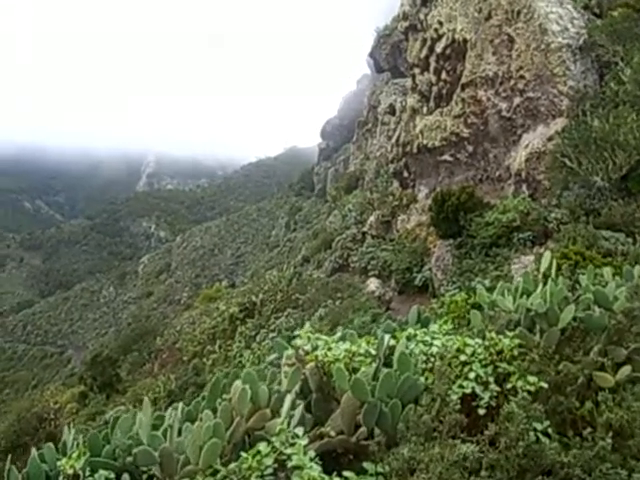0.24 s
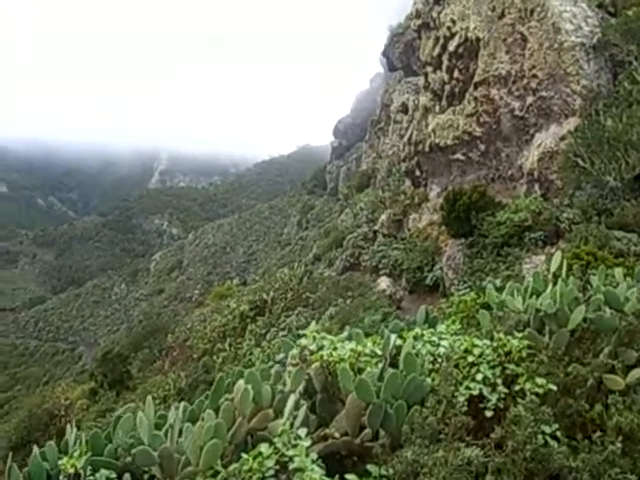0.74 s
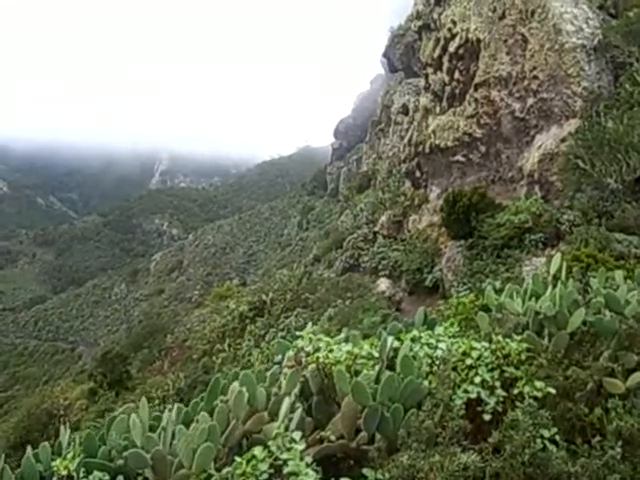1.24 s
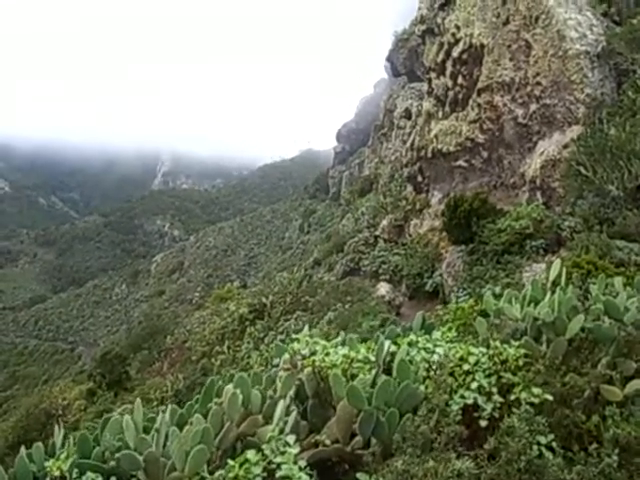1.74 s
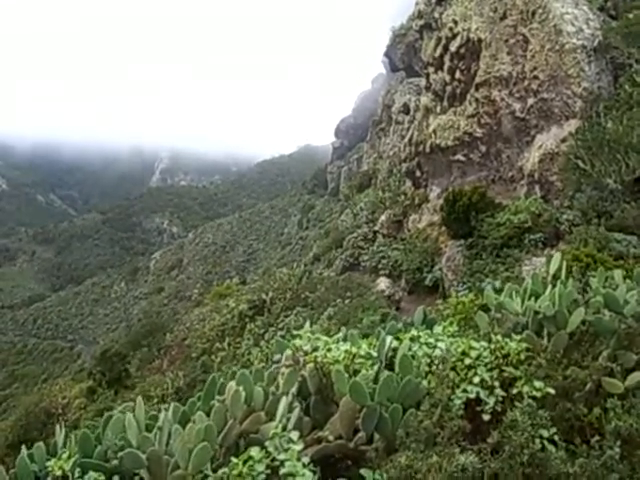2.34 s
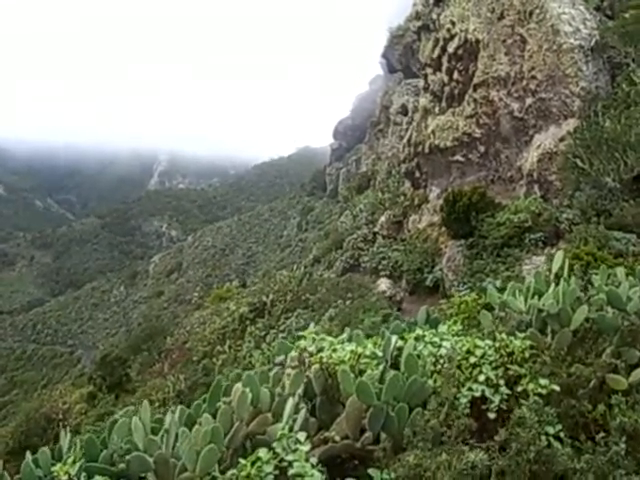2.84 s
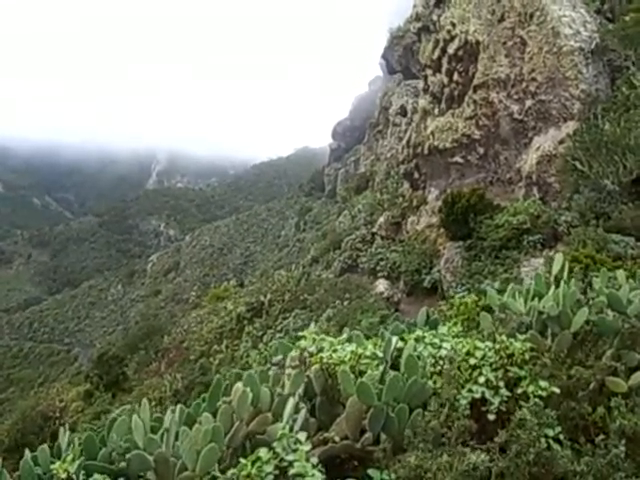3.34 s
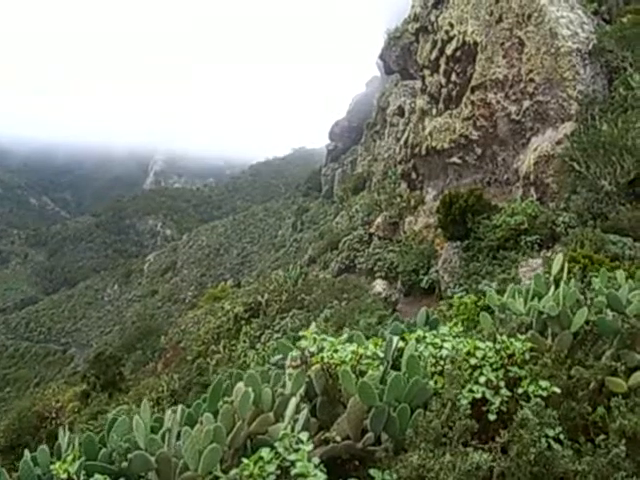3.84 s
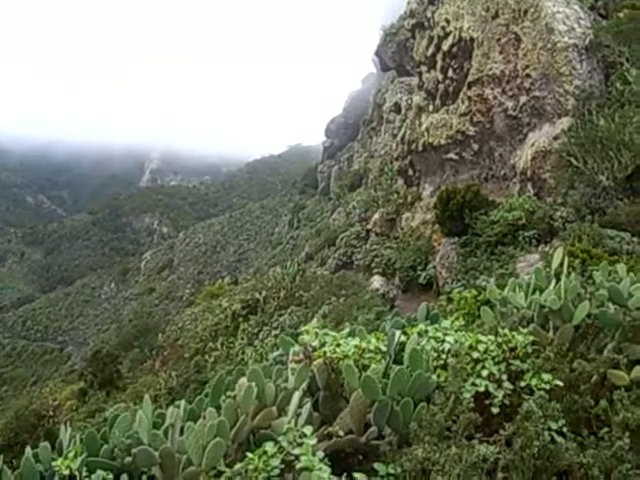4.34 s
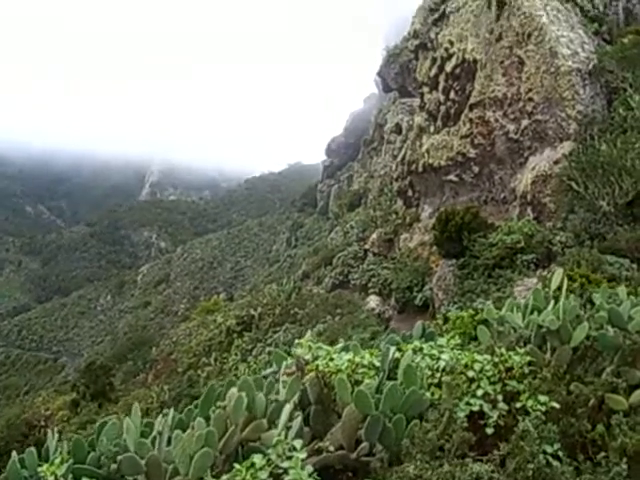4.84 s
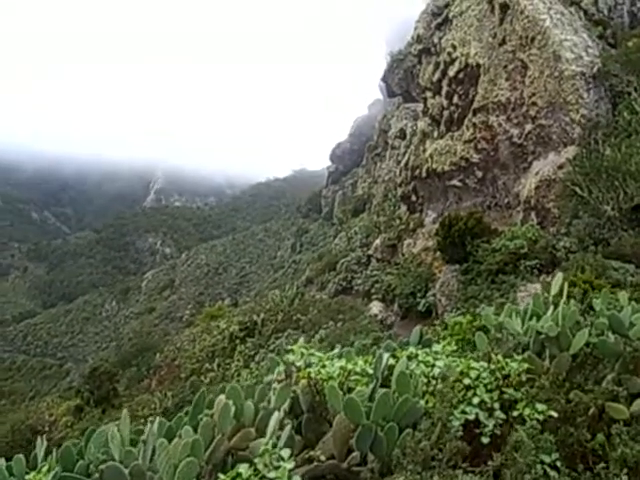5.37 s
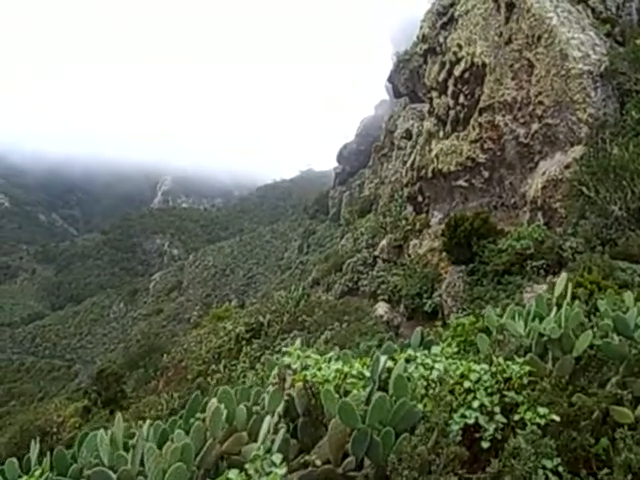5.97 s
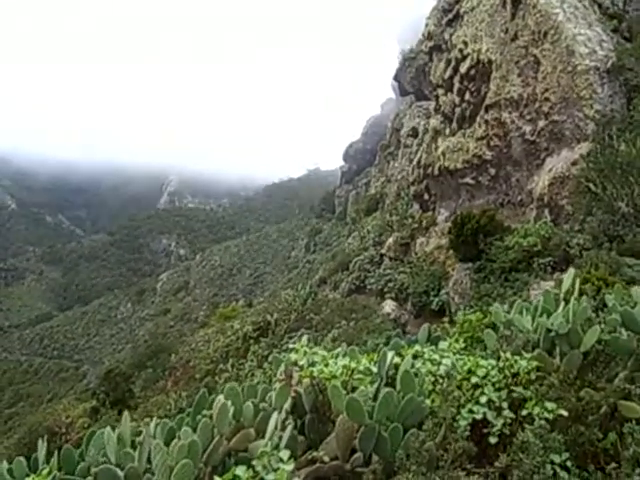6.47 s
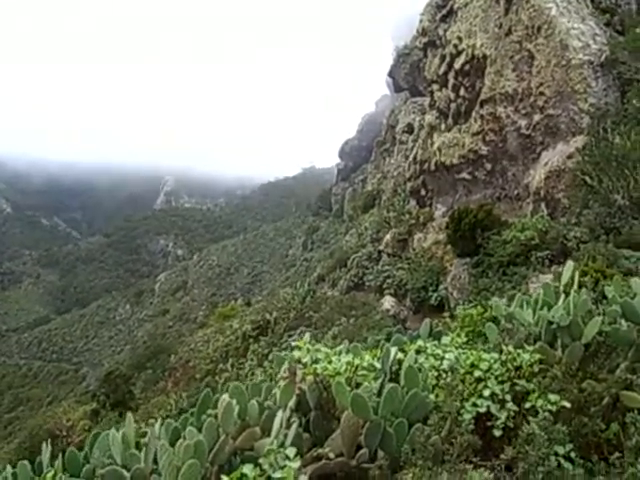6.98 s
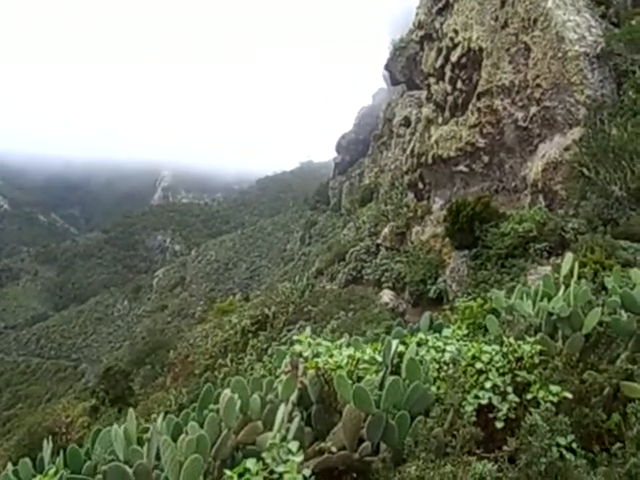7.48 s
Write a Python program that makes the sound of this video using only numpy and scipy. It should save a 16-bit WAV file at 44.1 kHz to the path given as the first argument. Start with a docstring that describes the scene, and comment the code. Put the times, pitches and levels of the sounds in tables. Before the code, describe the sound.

A soft, steady wash of open air runs throughout on a brushy hillside, with a distant bird giving very faint, short chirps. From about 1.1 to 1.8 seconds a small bird nearby sings three high, slightly rough falling notes, then lower, mellow warbles and chips until 2.6 seconds, with a slight cliff echo. A twig ticks at 2.2 seconds and leaves rustle faintly. Between 3 and 5.5 seconds the distant bird twitters while light puffs of wind rumble on the microphone; another tick comes at 4.8. The near bird gives two thin, very high whistles at 5.6 and 5.9 seconds, overlapped by the strongest gust, a brief low buffeting. A quick run of about five bright rising chirps follows from 6.1 to 6.8 seconds. Soft handling knocks sound faintly at 5.1 and 6 seconds, and a little more clearly twice around 6.9 to 7 seconds.

```python
"""A robin sings two phrases on a brushy hillside, each note a gliding near-sine from its syrinx.
Shrubs scatter the notes and a cliff throws them back; another bird answers from far away.
Soft valley air fills the pauses, leaves stir, twigs tick and gusts buffet the microphone.
The hand-held camera's electronics whine faintly, and its body rings under a few small knocks."""
import sys
import numpy as np
from scipy import signal
from scipy.fft import rfft, irfft, next_fast_len
from scipy.io import wavfile
from scipy.ndimage import uniform_filter1d

SR = 44100
rng = np.random.default_rng(int(sys.argv[2]) if len(sys.argv) > 2 else 0)


def digitize_waveform(pressure):
    """Quantize a signal to 16-bit integers and store it at the path in sys.argv[1].

    Rows of a 2-D input are taken as channels; values are limited to [-1, 1].
    """
    field = np.atleast_2d(pressure).T
    bounded = np.clip(field, -1, 1)
    quanta = np.round(bounded * 32767).astype(np.int16)
    wavfile.write(sys.argv[1], SR, quanta)


N = 340011
TIME = np.arange(N) / SR


def robin(shrubs_db=-1.0, crags_db=-29.5, face_db=-38, valley_db=-36, echo_s=.122):
    """The near bird, with scatter from shrubs, the cliff's echo and a faint valley tail."""
    song = syrinx([*sweeps(), *warbles(), *chips(), *thin_whistles(), *yodel()])
    near = song + gain_of(shrubs_db) * scatter(song, delay_s=.0017, rise_s=.0008, t60_s=.07)
    # the crags answer diffusely, the flat rock face all at once
    crags = gain_of(crags_db) * scatter(song, delay_s=.081, rise_s=.035, t60_s=.41)
    face = gain_of(face_db) * np.pad(near, (round(echo_s * SR), 0))[:N]
    valley = gain_of(valley_db) * scatter(song, delay_s=.03, rise_s=.03, t60_s=.7)
    return near + crags + face + valley


def syrinx(notes, flutter_db=1.5, octave_db=-21, fade_s=.0021):
    """A trembling near-sine voice. Each note: start_s, pitch_hz curve, level_db, tremble_share."""
    out, flutter, shake = np.zeros(N), wander(190), wander(530)
    for start_s, hz, db, tremble in notes:
        span = slice(round(start_s * SR), round(start_s * SR) + len(hz))
        t = TIME[span]
        pitch = uniform_filter1d(hz, size=130) * (1 + tremble * shake[span])
        phase = 2 * np.pi * np.cumsum(pitch) / SR
        edge_s = np.minimum(t - t[0], t[-1] - t)
        fade = np.sin(np.pi / 2 * np.clip(edge_s / fade_s, 0, 1))
        level = gain_of(db + flutter_db * flutter[span]) * fade
        # the throat lets the octave out only near its second resonance
        octave = gain_of(octave_db) / (1 + ((2 * pitch - 10600) / 1300) ** 4)
        out[span] += np.sqrt(2) * level * (np.sin(phase) + octave * np.sin(2 * phase))
    return out


def sweeps(tremble=.02, second_lag_s=.0081, second_s=.044, second_top_hz=7220, second_end_hz=5460):
    """Rough, steep slides to a shelf that drop onto a lower note, shadowed by a second voice."""
    # start_s, length_s, top_hz, shelf_hz, end_hz, bend (under 1 falls early), level_db, second_db
    notes = [(1.137, 0.098, 7600, 5970, 5005, 0.78, -32.5, -40.5),
             (1.474, 0.1, 7310, 6150, 5110, 0.91, -26, -34.5),
             (1.708, .086, 7400, 5740, 4860, 0.53, -24.5, -39)]
    for start_s, length_s, top_hz, shelf_hz, end_hz, bend, db, second_db in notes:
        t, progress = clock(length_s)
        slide = np.interp(progress, [.089, .59], [0, 1]) ** bend
        drop = np.interp(progress, [.59, .75], [0, 1])
        hz = top_hz + (shelf_hz - top_hz) * slide + (end_hz - shelf_hz) * drop
        yield start_s, hz, db + envelope_db(t, attack_s=.038, release_s=.025), tremble * (1 - .5 * drop)
        # the other side of the syrinx joins in, a little later and lower
        _, progress = clock(second_s)
        hz = second_end_hz + (second_top_hz - second_end_hz) * (1 - progress) ** 2
        yield start_s + second_lag_s, hz, second_db, tremble


def warbles(tremble=.00067):
    """Mellow notes that turn over a crest into a dip."""
    # start_s, length_s, crest_s, turn_stretch, crest_hz, dip_hz, level_db, ramp_db (over the note)
    notes = [(1.897, 0.14, .039, 1.044, 3733, 3210, -26, -2.5),
             (2.189, 0.13, 0.0261, 0.98, 3437, 2907, -36, 5),
             (2.483, 0.12, 0.0199, 1.4, 3503, 2900, -40, -6)]
    # the pitch turn they share: from_crest_s, height (0 dip, 1 crest)
    turn = [(-.04, 1.73), (-.023, .4), (-.008, .95), (.004, 1), (0.026, .1), (0.057, 0.079), (.095, .7)]
    for start_s, length_s, crest_s, stretch, crest_hz, dip_hz, db, ramp_db in notes:
        t, progress = clock(length_s)
        height = np.interp((t - crest_s) / stretch, *np.transpose(turn))
        hz = dip_hz + (crest_hz - dip_hz) * height
        level_db = db + ramp_db * progress + envelope_db(t, attack_s=.014, release_s=.044)
        yield start_s, hz, level_db, tremble


def chips(ease=2.7, tremble=.0046):
    """Short notes that shoot up and level off."""
    # start_s, length_s, first_hz, top_hz, attack_s, level_db
    notes = [(2.08, 0.051, 3210, 3556, 0.036, -24.5), (2.38, 0.04, 3050, 3668, 0.023, -33.5),
             (6.108, 0.02, 2780, 3980, 0.0098, -41), (6.279, 0.044, 2660, 4185, 0.021, -21),
             (6.428, 0.038, 2790, 3870, 0.015, -25), (6.567, 0.033, 2615, 3856, 0.016, -26.5),
             (6.726, 0.0322, 3070, 3660, 0.011, -29.5)]
    for start_s, length_s, first_hz, top_hz, attack_s, db in notes:
        t, progress = clock(length_s)
        hz = top_hz + (first_hz - top_hz) * (1 - progress) ** ease
        yield start_s, hz, db + envelope_db(t, attack_s, release_s=.014), tremble


def thin_whistles(flick_hz=1930, flick_s=.0043, arch_hz=881, arch_at_s=.0397, arch_width_s=.0437,
                  tremble=.0015):
    """High notes that flick in from above, arch and fade as they sink to rest."""
    # start_s, length_s, rest_hz, level_db
    notes = [(5.622, 0.11, 7370, -33), (5.905, 0.12, 7383, -26)]
    for start_s, length_s, rest_hz, db in notes:
        t, _ = clock(length_s)
        flick = flick_hz * np.exp(-t / flick_s)
        arch = arch_hz * np.exp(-((t - arch_at_s) / arch_width_s) ** 2)
        yield start_s, rest_hz + flick + arch, db + envelope_db(t, attack_s=.013, release_s=.12), tremble


def yodel(tremble=.00067):
    """A soft low note that breaks into a loud higher one."""
    # the note's path: time_s, pitch_hz, level_db
    contour = [(6.133, 2700, -43), (6.139, 2806, -39), (6.149, 2285, -48), (6.158, 3230, -29.5),
               (6.169, 3206, -24.5), (6.177, 2992, -21.5), (6.191, 3245, -28.5), (6.205, 3210, -32.5),
               (6.212, 3120, -47)]
    time_s, hz, db = np.transpose(contour)
    t = time_s[0] + clock(time_s[-1] - time_s[0])[0]
    yield time_s[0], np.interp(t, time_s, hz), np.interp(t, time_s, db), tremble


def fizz(song, hiss_db=-19.5):
    """A wide hiss rides on the loud notes, more on the high ones."""
    strength = np.sqrt(abs(uniform_filter1d(np.gradient(song) ** 2, size=200)))
    hiss = coloured([(200, -1.5), (2000, -.5), (7000, -.5), (12000, -1.5), (15500, -1)])
    return gain_of(hiss_db) * strength * hiss


def far_bird(direct_db=-7.0, wet_db=-10.0, waver=.01, flicker_db=2.4):
    """Short wavering glides, broken up and blurred by the distance."""
    # start_s, length_s, first_hz, last_hz, bend (under 1 moves early), relative_db
    glides = [(0.03, 0.023, 7400, 6970, 0.76, -59), (0.202, 0.035, 4000, 3430, 0.75, -63),
              (.24, 0.021, 7700, 6850, 0.6, -60), (.48, .03, 8550, 8130, 1, -66),
              (0.711, 0.14, 3580, 3430, 2.2, -62), (1.29, 0.126, 5530, 5500, 1, -60),
              (2.79, .035, 5400, 4770, .8, -64), (2.845, .033, 4620, 4340, 2, -58),
              (3.67, .07, 6000, 6940, .8, -66), (3.846, 0.062, 6000, 4480, 0.25, -58.5),
              (4.012, 0.068, 7120, 7400, 1, -68), (4.056, .07, 5070, 3620, 1.25, -58.5),
              (4.165, 0.24, 3490, 3460, 0.8, -67), (4.275, 0.086, 5950, 6780, 1.6, -62),
              (4.457, 0.067, 5100, 4570, 0.46, -56.5), (4.534, 0.1, 3380, 6300, 1.2, -58),
              (4.602, 0.11, 2620, 3700, 1.1, -62), (4.693, 0.076, 4580, 3520, 1.2, -58),
              (5.278, .045, 4300, 3200, 0.54, -61), (5.471, .11, 4400, 3030, 0.38, -62),
              (6.89, .04, 7600, 7300, .7, -63), (7.21, 0.06, 5340, 4200, 1.2, -62),
              (7.418, 0.072, 3630, 4340, 0.95, -59)]
    song = np.zeros(N)
    tremble = 1 + waver * wander(130)
    for start_s, length_s, first_hz, last_hz, bend, db in glides:
        t, progress = clock(length_s)
        glide = np.sin(np.pi / 2 * progress ** bend) ** 2
        pitch = (first_hz + (last_hz - first_hz) * glide) * tremble[round(start_s * SR):][:len(t)]
        note = np.sin(2 * np.pi * np.cumsum(pitch) / SR) * signal.windows.tukey(len(t), .2)
        add(song, start_s, np.sqrt(2) * gain_of(db) * note)
    song *= gain_of(flicker_db * wander(80))
    blur = scatter(song, delay_s=.0018, rise_s=.0024, t60_s=.079)
    return gain_of(direct_db) * song + gain_of(wet_db) * blur


def wind(spread_db=2, eddy_gap_s=.032, jitter_s=.0017):
    """Turbulence at the microphone: swells of rumble, and runs of pressure pulses with a rebound."""
    # rumble swells: peak_s, half_length_s, level_db
    gusts = [(3.214, 0.021, -41), (3.352, 0.047, -38.5), (3.795, 0.032, -40.5), (4.173, .07, -46),
             (4.315, 0.025, -40.5), (4.583, 0.027, -46), (5.55, 0.03, -46), (5.843, 0.058, -27),
             (6.1, 0.071, -44), (6.28, 0.061, -45.5), (6.772, 0.0091, -37.5), (7.176, 0.019, -45)]
    # runs of eddies shed by gusts: start_s, length_s, level_db, eddy_width_s
    buffets = [(3.784, .02, -31, .0055), (5.738, .18, -20, 0.0036), (6.095, .065, -30.5, 0.0068)]
    rumble = coloured([(8, 6), (22, 4), (40, 7), (65, -10.5), (110, -13.5), (220, -28), (500, -55),
                       (2000, -89)])
    out = sum(swell(*gust) for gust in gusts) * rumble
    for start_s, length_s, db, width_s in buffets:
        eddy_times = np.arange(start_s, start_s + length_s, eddy_gap_s)
        for at_s, (late, strong, sign) in zip(eddy_times, rng.standard_normal(size=(16, 3))):
            offset = (TIME - at_s - jitter_s * late) / width_s
            eddy = (1 - offset ** 2) / (1 + offset ** 2 / 3) ** 3
            out += np.sign(sign) * gain_of(db + spread_db * strong) * eddy
    return out


def camera_knocks(soft_hz=2600):
    """Short soft scuffs that ring the heavily damped camera body."""
    # start_s, push_db, contact_decay_s
    knocks = [(5.078, -42, .002), (5.988, -41, 0.0029), (6.8846, -33, 0.0021), (6.894, -51, 0.027),
              (6.981, -36.5, 0.0087)]
    # body resonances: pitch_hz, width_hz, relative_db
    modes = [(121, 90, -4.5), (610, 640, 11), (920, 700, -45), (1380, 340, -45), (2400, 1000, -26)]
    push, t = np.zeros(N), np.arange(SR // 8) / SR
    for start_s, db, decay_s in knocks:
        add(push, start_s, gain_of(db) * rng.standard_normal(len(t)) * np.exp(-t / decay_s))
    soft_push = signal.sosfilt(signal.butter(2, soft_hz, fs=SR, output="sos"), push)
    ring = sum(gain_of(db) * np.exp(-np.pi * width_hz * t) * np.cos(2 * np.pi * hz * t)
               for hz, width_hz, db in modes)
    return signal.fftconvolve(soft_push, ring / np.linalg.norm(ring))[:N]


def twigs(ring_hz=1700, ring_s=.00052):
    """Twigs give dry ticks of a cycle or two."""
    # start_s, level_db
    ticks = [(2.2057, -31.5), (4.777, -37)]
    out = np.zeros(N)
    t, _ = clock(.01)
    for start_s, db in ticks:
        add(out, start_s, gain_of(db) * np.exp(-t / ring_s) * np.sin(2 * np.pi * ring_hz * t))
    return out


def leaves(flicker_db=.9):
    """The breeze stirs the shrubs unevenly: green leaves rustle, dry ones crackle."""
    # peak_s, half_length_s, green_db, dry_db
    stirs = [(1.65, 0.19, -69, -85), (2.32, 0.07, -55, -58.5), (4.9, 0.16, -59.5, -81),
             (6.35, 0.38, -63, -77), (6.96, 0.12, -61.5, -68.5)]
    # tone of each kind of leaf: frequency_hz, relative_db
    green_spectrum = [(100, -20.5), (350, 1.5), (900, 3.5), (2000, -8.5), (5000, -10), (11000, -20.5),
                      (15500, -30)]
    dry_spectrum = [(1000, -33), (3300, 0), (7500, -7.5), (10000, 2), (12500, -6), (15500, -26)]
    flicker = gain_of(flicker_db * wander(70))
    rustle = sum(swell(peak_s, half_s, db) for peak_s, half_s, db, _ in stirs) * coloured(green_spectrum)
    crackle = sum(swell(peak_s, half_s, db) for peak_s, half_s, _, db in stirs) * coloured(dry_spectrum)
    return flicker * (rustle + crackle)


def valley_air(level_db=-52.5, swell_db=.47):
    """A soft, nearly steady wash of open air."""
    # tone of the wash: frequency_hz, relative_db
    spectrum = [(12, -31), (20, 0.5), (70, -8), (116, -16), (213, -14.5), (238, -18), (289, -16),
                (478, -19.5), (631, -21), (2470, -28), (3540, -30.5), (6020, -35.5), (8170, -37.5),
                (13500, -41.5), (15500, -43)]
    return gain_of(level_db + swell_db * wander(4.9)) * coloured(spectrum)


def camera_whine(frame_hz=29.97):
    """Thin tones of the camera's electronics, throbbing once a picture frame."""
    # pitch_hz, level_db, throb_depth (0-1)
    tones = [(7881, -83, .9), (15735, -73, .5)]
    throb = np.cos(2 * np.pi * frame_hz * TIME)
    return sum(np.sqrt(2) * gain_of(db) * (1 + depth * throb) * np.sin(2 * np.pi * hz * TIME)
               for hz, db, depth in tones)


def scatter(sound, delay_s, rise_s, t60_s):
    """A cloud of small reflections that builds up after a delay and dies away."""
    age = np.maximum(np.arange(SR) / SR - delay_s, 0)
    taps = rng.standard_normal(SR) * (rng.random(SR) < .05)
    taps *= (1 - np.exp(-age / rise_s)) * np.exp(-np.log(1000) * age / t60_s)
    return signal.fftconvolve(sound, taps / np.linalg.norm(taps))[:N]


def envelope_db(t, attack_s, release_s, onset_db=-21.5, ending_db=-19):
    """A note swells from onset_db, holds at 0 dB if there is time, and sinks to ending_db."""
    attack = np.maximum(1 - t / attack_s, 0) ** 2
    release = np.maximum(1 - (t[-1] - t) / release_s, 0) ** 2
    return onset_db * attack + ending_db * release


def swell(peak_s, half_s, db):
    """A bell-shaped rise and fall of gain."""
    return gain_of(db) * np.exp(-((TIME - peak_s) / half_s) ** 2 / 2)


def wander(hz):
    """Random drift of rms 1, up to about the given rate."""
    return filtered_noise(lambda f: np.exp(-(f / hz) ** 2))


def coloured(points):
    """Noise of rms 1 shaped by (frequency_hz, relative_db) points."""
    hz, db = np.transpose(points)
    return filtered_noise(lambda f: gain_of(np.interp(np.log(f + 1), np.log(hz + 1), db)))


def filtered_noise(shape):
    """Noise of rms 1 whose spectrum follows shape(frequency_hz)."""
    n = next_fast_len(N, True)
    spectrum = rfft(rng.standard_normal(n)) * shape(np.fft.rfftfreq(n, 1 / SR))
    noise = irfft(spectrum, n)[:N]
    return noise / np.sqrt(np.mean(noise ** 2) + 1e-20)


def clock(length_s):
    """Seconds since the start of a sound, and its progress from 0 to 1."""
    t = np.arange(round(length_s * SR)) / SR
    return t, t / length_s


def gain_of(db):
    """Decibels to amplitude."""
    return 10 ** (np.asarray(db) / 20)


def add(mix, start_s, sound):
    """Mixes a sound in at start_s."""
    part = mix[round(start_s * SR):][:len(sound)]
    part += sound[:len(part)]


def scene():
    """The birds, the hillside and the camera at one microphone."""
    song = robin()
    birds = song + fizz(song) + far_bird()
    return (birds + valley_air() + leaves() + wind() + camera_knocks() + twigs() + camera_whine())[None]


def record(dry):
    """The recorder's band limit cuts the top treble steeply."""
    edge_hz = 15850
    band_limit = signal.firwin(1023, edge_hz, window=("kaiser", 9), fs=SR)
    return signal.oaconvolve(dry, band_limit[None], "same")


dry = scene()
out = record(dry)
digitize_waveform(out)
```